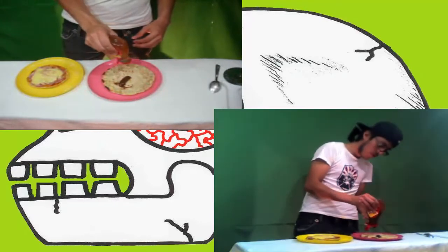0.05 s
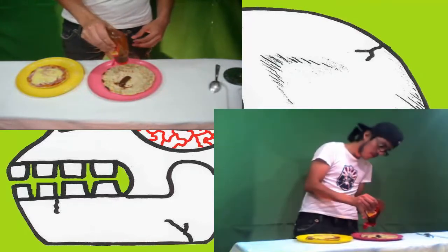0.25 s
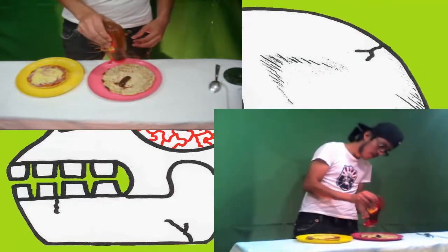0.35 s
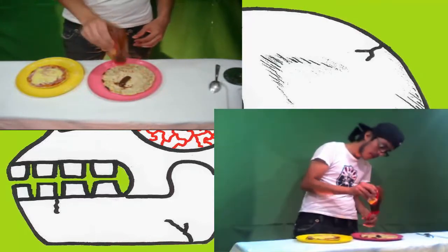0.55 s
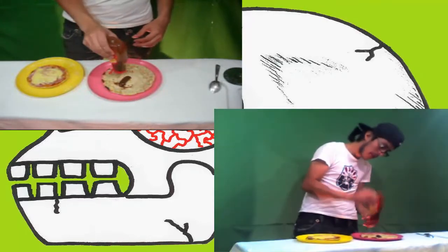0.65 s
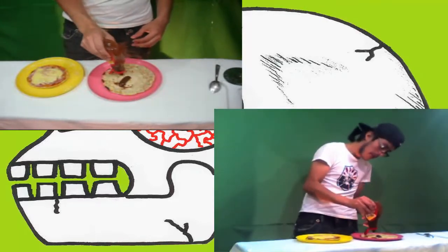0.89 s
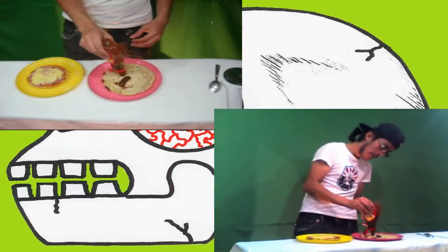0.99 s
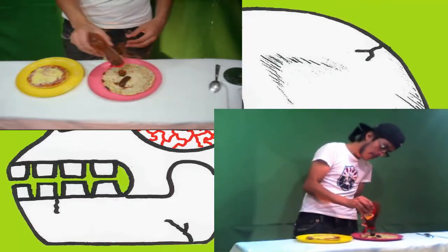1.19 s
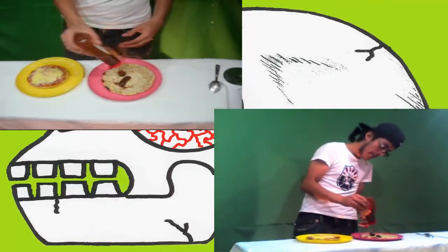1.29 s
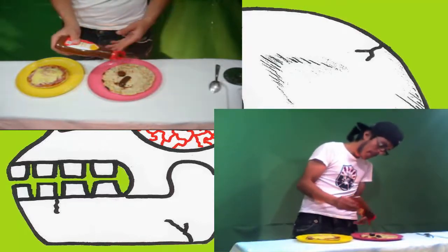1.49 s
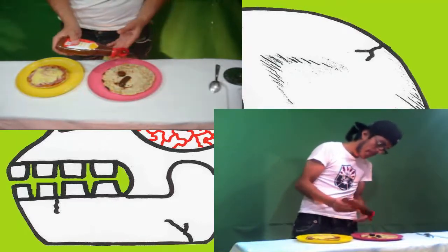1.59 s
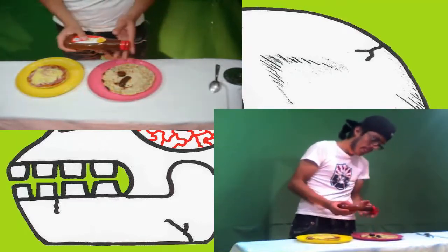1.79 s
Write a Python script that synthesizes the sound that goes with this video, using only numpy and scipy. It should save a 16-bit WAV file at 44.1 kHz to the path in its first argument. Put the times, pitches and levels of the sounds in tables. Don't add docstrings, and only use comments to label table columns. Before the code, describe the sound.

Squeeze bottle thumps and clicks with brief squelching spurts of sauce come in two bursts, then faint knocks, over low house rumble in a small room, captured close by a lo-fi camera with coarse digital grit.

```python
import sys
import numpy as np
from scipy import signal
from scipy.fft import rfft, irfft, next_fast_len
from scipy.io import wavfile
from scipy.ndimage import map_coordinates

SR = 44100
rng = np.random.default_rng(int(sys.argv[2]) if len(sys.argv) > 2 else 0)


def transcribe(signal):
    frames = np.atleast_2d(signal).T
    limited = np.clip(frames, -1, 1)
    pcm = np.round(limited * 32767).astype(np.int16)
    wavfile.write(sys.argv[1], SR, pcm)


def boost_factor(decibels):
    exponent = np.asarray(decibels, float) / 20
    return 10 ** exponent


N = 81585
EVENT_S = 0.4


def unit(x):
    return x / np.sqrt(np.mean(x ** 2) + 1e-20)


def along(points, hz):
    f, v = np.transpose(points)
    return np.interp(np.log(hz + 1), np.log(f + 1), v)


def filtered(x, response):
    n = x.shape[-1]
    m = next_fast_len(n + SR // 4)
    return irfft(rfft(x, m) * response(np.fft.rfftfreq(m, 1 / SR)), m)[..., :n]


def wander(t, per_s, points):
    return map_coordinates(rng.standard_normal(points), [t * per_s])


def add(out, s, x):
    part = out[round(s * SR):][:len(x)]
    part += x[:len(part)]


# f/Hz, level/dB
RUMBLE_COLOUR = [(5, -29.5), (8, 2.5), (95, -14.5), (150, -19.5), (280, -23), (650, -31.5), (950, -34),
                 (1200, -41), (2500, -47.5), (4000, -52)]
# f/Hz, level/dB
PATTER_COLOUR = [(90, -32.5), (140, -0.5), (260, 1.5), (450, -11), (700, -25.5)]
# f/Hz, level/dB
HUM_TONES = [(60, -54.5), (90.5, -51), (888.5, -62.5)]


def house():
    t = np.arange(N) / SR
    rumble_db = -39.5 + 1 * wander(t, 12, 40)
    rumble = unit(filtered(rng.standard_normal(N), lambda hz: boost_factor(along(RUMBLE_COLOUR, hz))))
    hum = np.zeros(N)
    for hz, db in HUM_TONES:
        hum += boost_factor(db + 4.5 + 1.6 * wander(t, 9, 40)) * np.sin(2 * np.pi * hz * t)
    lumps = boost_factor(9 * wander(t, 35, 80))
    handling = filtered(rng.standard_normal(N), lambda hz: boost_factor(along(PATTER_COLOUR, hz)))
    return boost_factor(rumble_db) * rumble + boost_factor(-53) * unit(lumps * handling) + hum


def resonances(peaks):
    def response(f):
        total = 0
        for k, (centre, width, db) in enumerate(peaks):
            peak = 1j * f * width / (centre * centre - f * f + 1j * f * width)
            total = total + (-1) ** k * boost_factor(db) * peak
        return total
    return response


def plips(n):
    count, pitch_hz, pitch_spread, length_s, fall = 120, 3500, 0.15, 0.011, 0.14
    out, t = np.zeros(n), np.arange(int(length_s * SR)) / SR
    for when, tone, size in zip(rng.random(count), *rng.standard_normal((2, count))):
        hz = pitch_hz * np.exp(pitch_spread * tone)
        phase = 2 * np.pi * hz * t * (1 - fall * t / length_s / 2)
        envelope = boost_factor(4 * size - 40 * t / length_s) * np.minimum(t / 0.0014, 1)
        add(out, when * EVENT_S, envelope * np.sin(phase))
    return unit(out)


# f/Hz, width/Hz, level/dB
NOZZLE_PEAKS = [(2740, 450, -2), (3500, 760, -2.5), (3907, 450, -2)]
# f/Hz, width/Hz, level/dB
MOUTH_PEAKS = [(555, 250, -0.5), (839, 320, 2.5), (1384, 530, -3), (1853, 400, -4.5)]
# t/s, level/dB, rise/s, t60/s, mouth level/dB
SPUTTER_EVENTS = [
    (.137, -44, 0.029, 0.44, -1.5),
    (.197, -39, 0.0059, 0.2, 1.5),
    (0.27, -50, 0.008, .22, -2.5),
    (0.883, -49.5, 0.0055, 0.26, 2.5),
    (1.045, -48.5, 0.043, .26, -4),
    (1.112, -44, .003, 0.089, -3.5),
    (1.73, -58, 0.0024, 0.14, -24),
]


def sputters():
    bubbles_per_s, bubble_spread_db, air_db, plip_db = 2000, 4, -5, -2.5
    out, t = np.zeros(N), np.arange(int(EVENT_S * SR)) / SR
    for s, db, rise, t60, mouth_db in SPUTTER_EVENTS:
        size, air = rng.standard_normal((2, len(t)))
        burst_now = rng.random(len(t)) < bubbles_per_s / SR
        bubbles = unit(burst_now * np.sign(air) * boost_factor(bubble_spread_db * size))
        bursts = bubbles + boost_factor(air_db) * air
        nozzle = unit(filtered(bursts, resonances(NOZZLE_PEAKS))) + boost_factor(plip_db) * plips(len(t))
        mouth = unit(filtered(bursts, resonances(MOUTH_PEAKS)))
        envelope = boost_factor(db - 60 * np.maximum(t - rise, 0) / t60) * np.minimum(t / rise, 1) ** 2
        add(out, s, envelope * (nozzle + boost_factor(mouth_db) * mouth))
    return out


def ring(modes, t, spread_db, waver=0):
    out = np.zeros(len(t))
    for hz, db, t60 in modes:
        level = boost_factor(db + spread_db * rng.standard_normal() - 60 * t / t60)
        drift = waver * map_coordinates(np.append(0, rng.standard_normal(20)), [t * 40], order=1)
        out += level * np.sin(2 * np.pi * hz * t + drift)
    return out


# f/Hz, level/dB, t60/s
TABLE_MODES = [(134.8, -20.5, .2), (191, -13, .26), (263.3, -18, 0.26), (341.2, -19.5, 0.14),
               (413.4, -25, .25), (471.8, -20, .22), (545, -20.5, .28), (615.8, -23.5, .18),
               (714.4, -28.5, 0.11)]
# t/s, level/dB, f/Hz, swell/s, table level/dB
THUMP_EVENTS = [(0.14, -29.5, 237, 0.0031, -11), (.205, -33.5, 196, 0.0092, 1.5),
                (0.269, -8, 232.7, 0.0039, -5.5), (0.2842, -9, 237, 0.0027, -5),
                (0.2996, -19.5, 217.6, 0.0027, -1), (.306, -19, 272, .003, -1),
                (.713, -41, 195.4, 0.0033, 1), (.775, -42, 205, 0.0047, 2.5),
                (0.8439, -34.5, 232, 0.0034, -8), (.879, -29, 146.5, 0.0032, 0),
                (.978, -36, 269, 0.0027, -8), (1.0796, -11, 227.2, 0.0044, -7.5),
                (1.108, -16.5, 215.6, 0.0018, 2.5), (1.114, -17.5, 258.8, 0.0044, 2),
                (1.146, -26, 330.6, 0.0029, -1), (1.315, -40, 402.7, 0.0017, -6.5),
                (1.375, -43, 327, 0.0021, -0.5), (1.582, -37.5, 201, 0.0051, 1),
                (1.729, -33, 290.4, 0.0025, -2.5)]


def thumps():
    push_t60, push_phase = 0.028, 2.6
    out, t = np.zeros(N), np.arange(int(EVENT_S * SR)) / SR
    for s, db, hz, swell, table_db in THUMP_EVENTS:
        rise = np.sin(np.pi / 2 * np.minimum(t / swell, 1)) ** 2
        push_fall = boost_factor(-60 * np.maximum(t - swell, 0) / push_t60)
        push = push_fall * np.sin(2 * np.pi * hz * t + push_phase)
        table = ring(TABLE_MODES, t, spread_db=1, waver=0.97)
        add(out, s, boost_factor(db) * rise * (push + boost_factor(table_db) * table))
    return out


# ratio to cap pitch, level/dB, t60/s
CAP_MODES = [(0.942, -8.5, 0.011), (0.998, 6.5, .03), (1.052, -5.5, 0.037), (1.098, 2, 0.017)]
# f/Hz, level/dB, t60/s
BODY_MODES = [(543, -14.5, 0.11), (644, -14, 0.073), (750.3, 0.5, 0.039), (860, 4, 0.023),
              (1025, -19, 0.042)]
# t/s, level/dB, cap f/Hz, body level/dB
SNAP_EVENTS = [(.160, -49.5, 3645, -21.5), (.177, -41, 3670, -10.5), (.204, -36.5, 2727, 2.5),
               (.2095, -38.5, 3680, -13), (.273, -38.5, 2675, 7), (.2865, -43.5, 2760, 17),
               (.303, -43.5, 2615, 7), (.8855, -45, 1890, 11), (1.0824, -45, 3210, -7),
               (1.1113, -31, 3500, 9.5), (1.121, -42, 3490, 11), (1.149, -53, 3460, 18.5),
               (1.7294, -52.5, 2956, 2.5)]


def snaps():
    crack_db, crack_t60, cap_rise_s, body_rise_s = -18, 0.004, 0.0014, 0.00042
    out, t = np.zeros(N), np.arange(int(EVENT_S * SR)) / SR
    for s, db, hz, body_db in SNAP_EVENTS:
        crack = boost_factor(crack_db - 60 * t / crack_t60) * rng.standard_normal(len(t))
        cap_modes = [(hz * ratio, level, t60) for ratio, level, t60 in CAP_MODES]
        cap = (1 - np.exp(-t / cap_rise_s)) * ring(cap_modes, t, spread_db=1.5)
        body = (1 - np.exp(-t / body_rise_s)) * ring(BODY_MODES, t, spread_db=0.5)
        add(out, s, boost_factor(db) * (crack + cap + boost_factor(body_db) * body))
    return out


# f/Hz, t60/s
KITCHEN_T60 = [(150, .3), (600, 0.34), (1500, .25), (4000, 0.26)]
# f/Hz, level/dB
ROOM_COLOUR = [(130, -6), (250, -4), (600, -3), (4000, -1.5)]


def kitchen(x):
    delay_s = 0.009
    hz, t, z = signal.stft(rng.standard_normal(SR // 2), SR, nperseg=256)
    colour_db, t60 = along(ROOM_COLOUR, hz)[:, None], along(KITCHEN_T60, hz)[:, None]
    tail = signal.istft(z * boost_factor(colour_db - 60 * t / t60), SR, nperseg=256)[1]
    delayed = np.pad(x, (int(delay_s * SR), 0))
    return signal.fftconvolve(delayed, tail / np.linalg.norm(tail))[:N]


def scene():
    bottle = sputters() + thumps() + snaps()
    return (bottle + boost_factor(-10) * kitchen(bottle) + house())[None]


def top_cut(x):
    return signal.sosfilt(signal.butter(12, 16950, fs=SR, output="sos"), x)


def record(dry):
    rate_hz, blocks_per_s, slip_samples, level_step = 8000, 15.67, 0.435, 0.00388
    t = np.arange(N) / SR
    slot = np.floor(rate_hz * t + slip_samples * np.floor(blocks_per_s * t))
    levels = level_step * np.floor(filtered(dry, lambda hz: hz < 4050) / level_step)
    held = levels[:, np.searchsorted(slot, slot)]
    mix = filtered(held, lambda hz: boost_factor(-0.15 * np.maximum(hz - 15780, 0)))
    return top_cut(mix)


dry = scene()
out = record(dry)
transcribe(out)
```